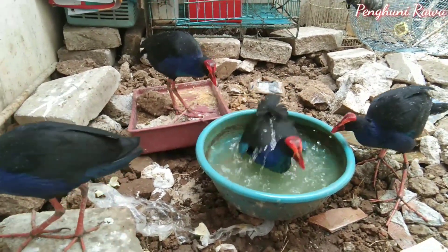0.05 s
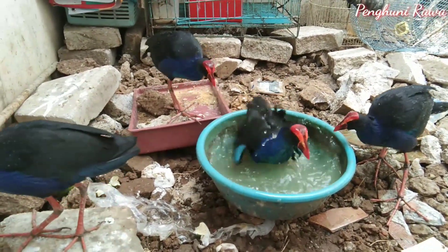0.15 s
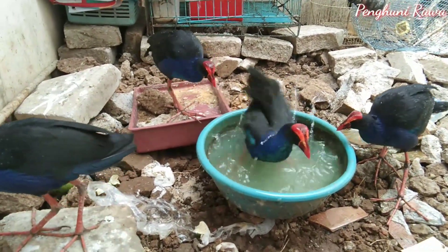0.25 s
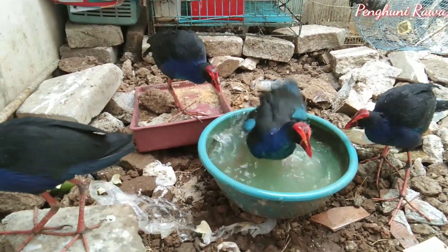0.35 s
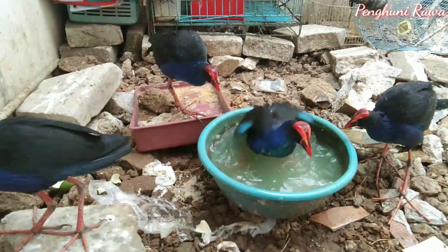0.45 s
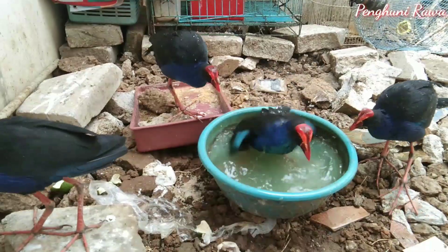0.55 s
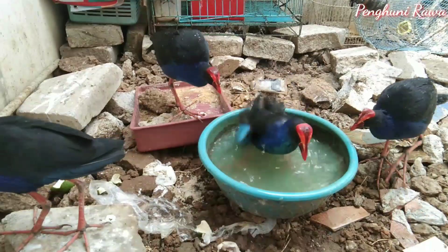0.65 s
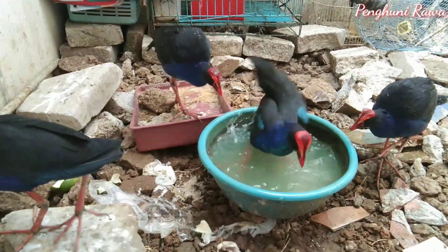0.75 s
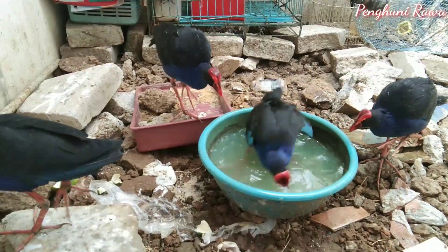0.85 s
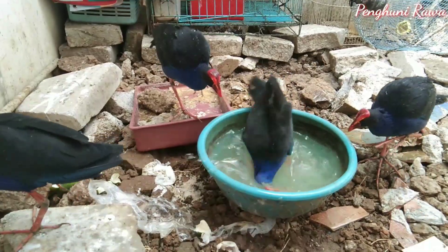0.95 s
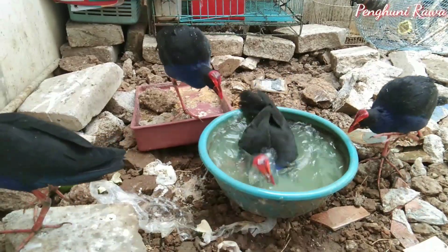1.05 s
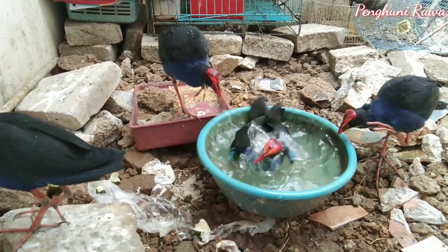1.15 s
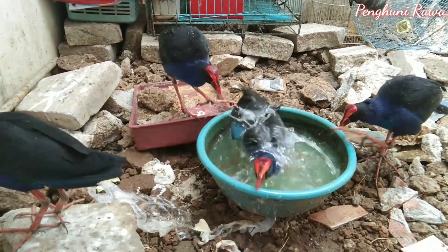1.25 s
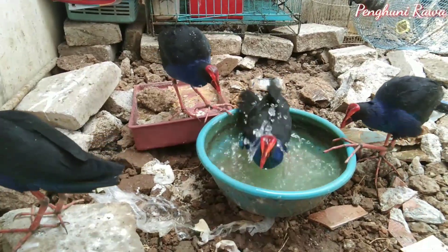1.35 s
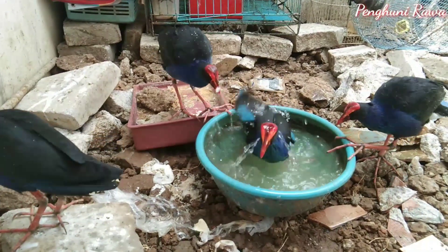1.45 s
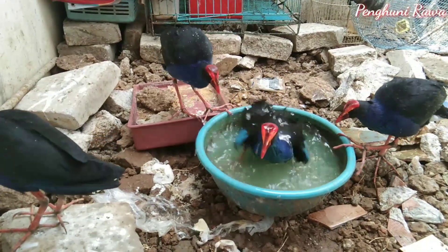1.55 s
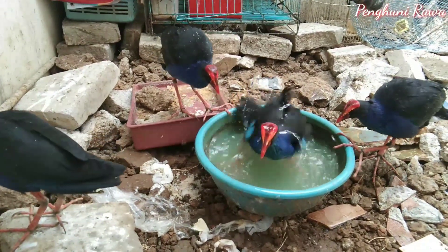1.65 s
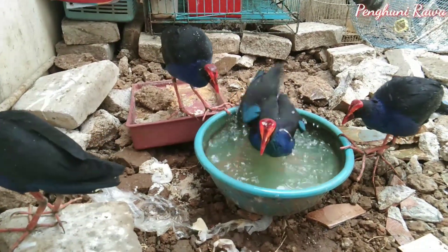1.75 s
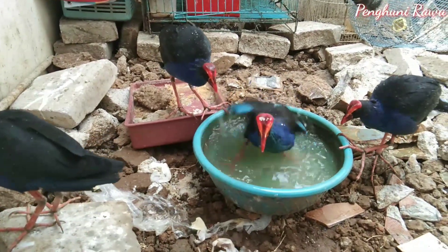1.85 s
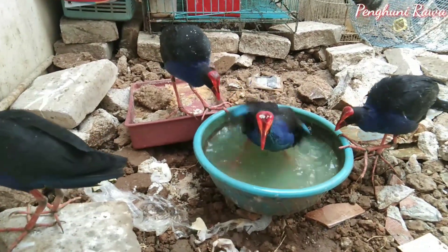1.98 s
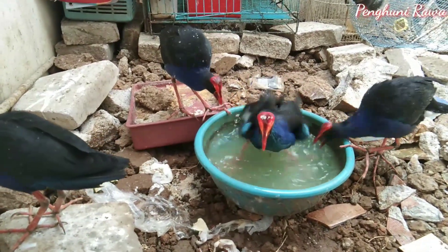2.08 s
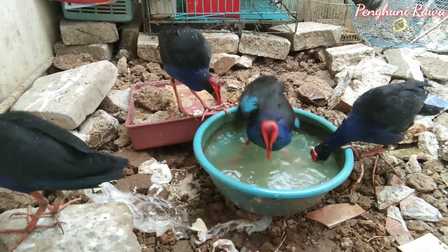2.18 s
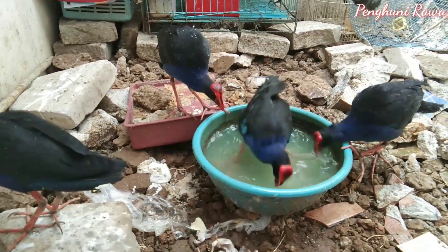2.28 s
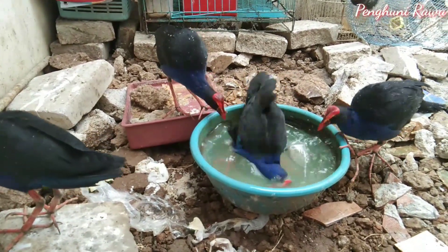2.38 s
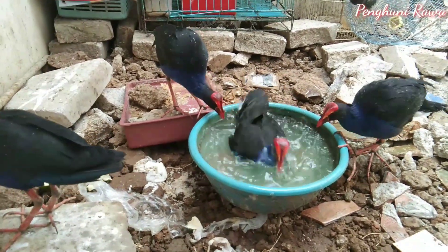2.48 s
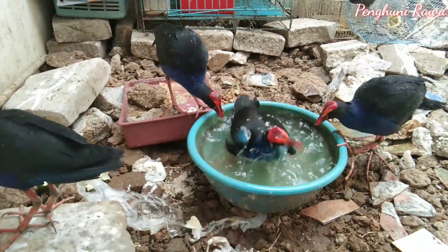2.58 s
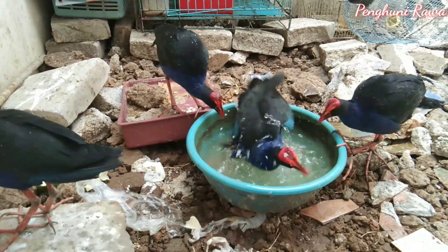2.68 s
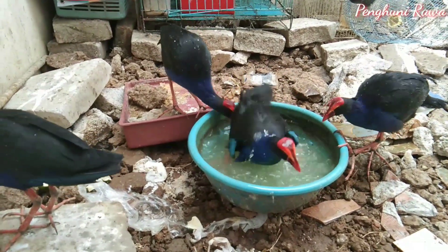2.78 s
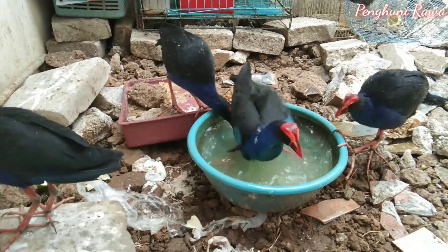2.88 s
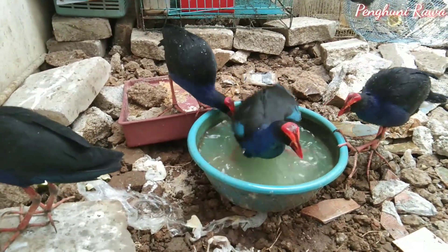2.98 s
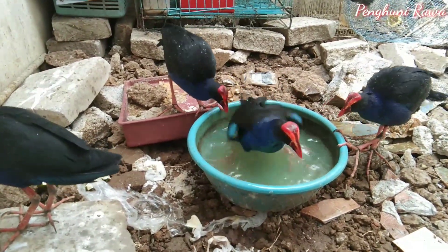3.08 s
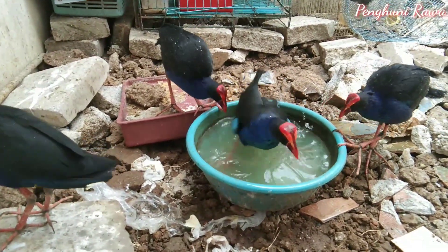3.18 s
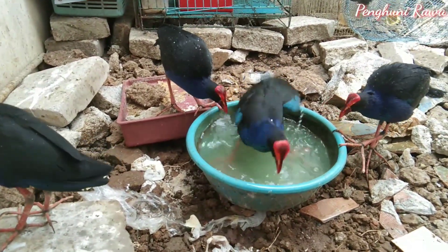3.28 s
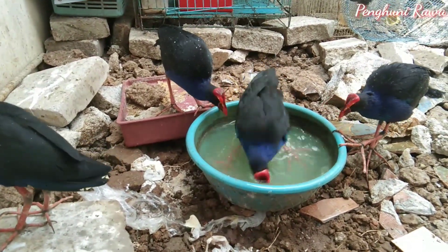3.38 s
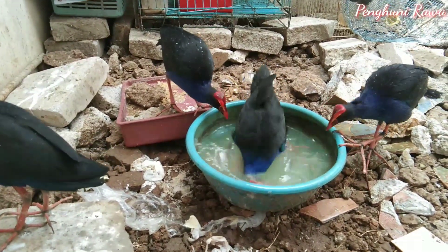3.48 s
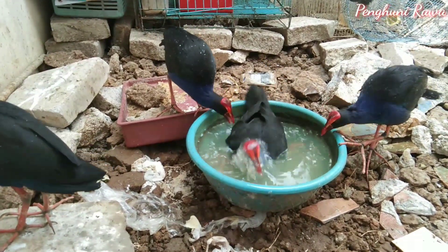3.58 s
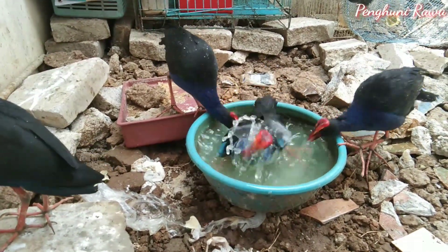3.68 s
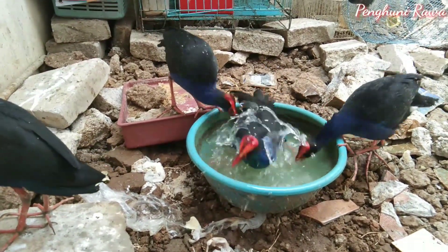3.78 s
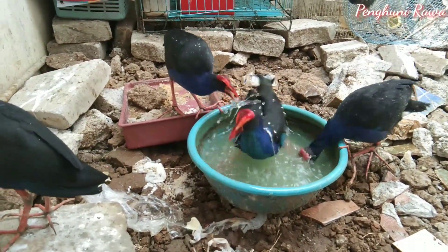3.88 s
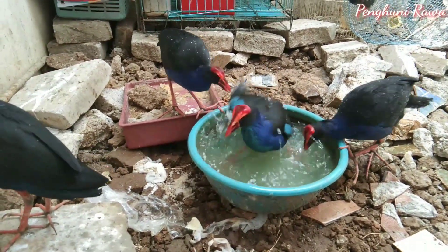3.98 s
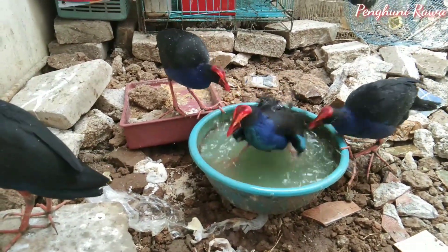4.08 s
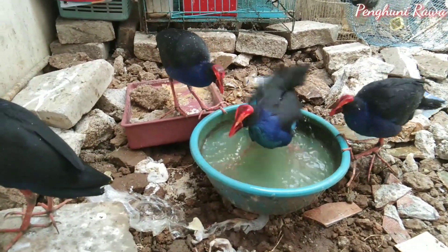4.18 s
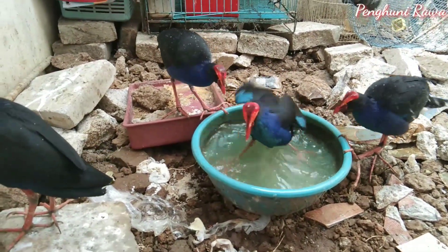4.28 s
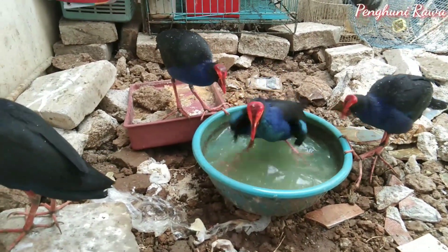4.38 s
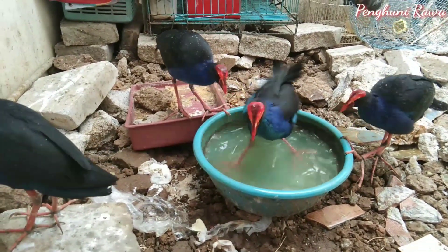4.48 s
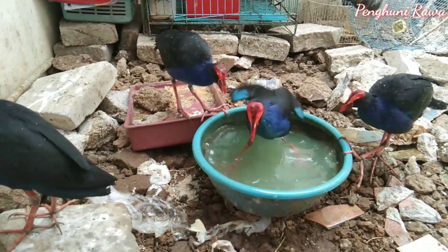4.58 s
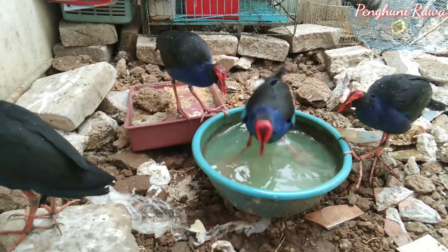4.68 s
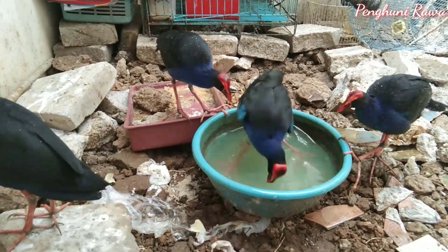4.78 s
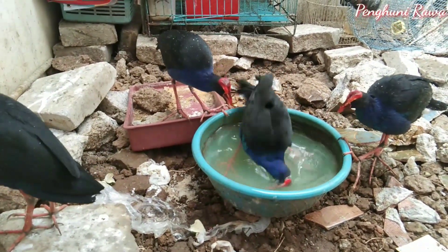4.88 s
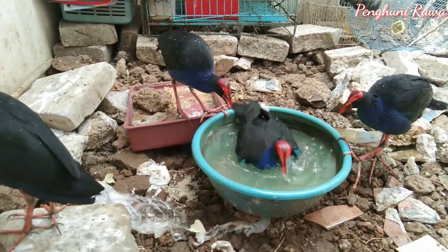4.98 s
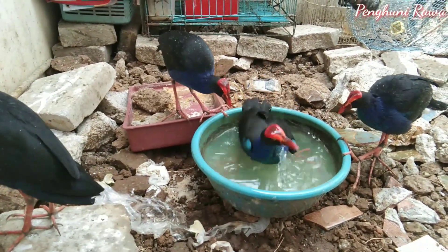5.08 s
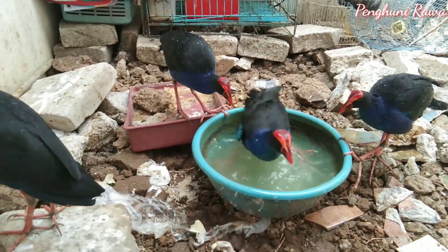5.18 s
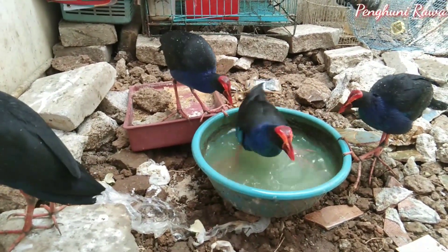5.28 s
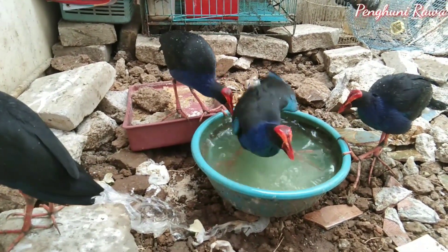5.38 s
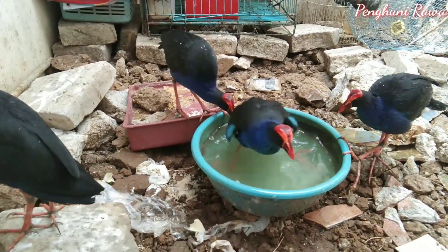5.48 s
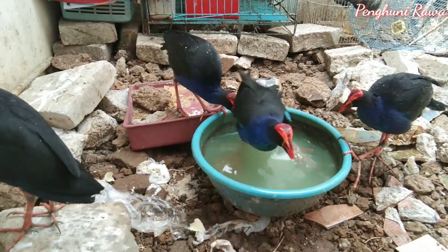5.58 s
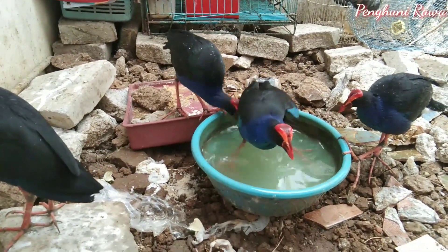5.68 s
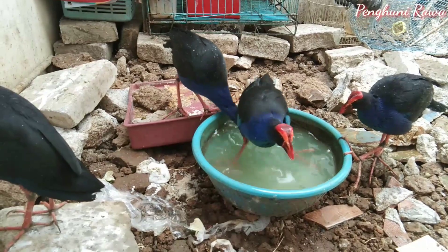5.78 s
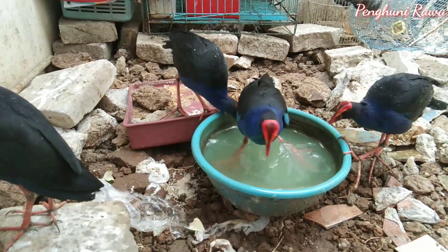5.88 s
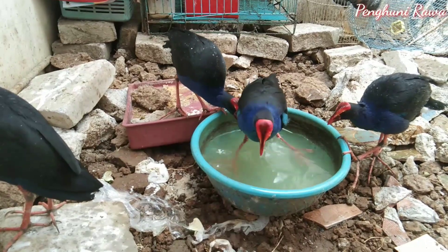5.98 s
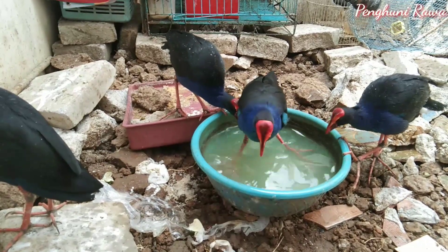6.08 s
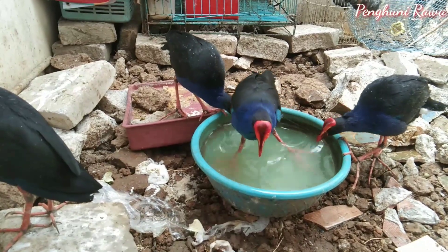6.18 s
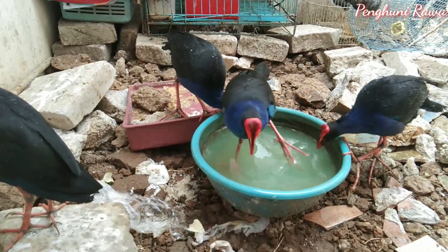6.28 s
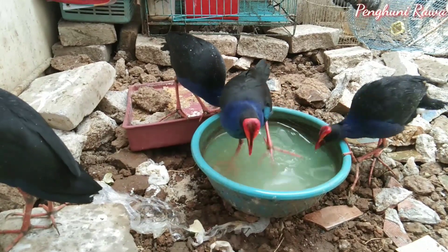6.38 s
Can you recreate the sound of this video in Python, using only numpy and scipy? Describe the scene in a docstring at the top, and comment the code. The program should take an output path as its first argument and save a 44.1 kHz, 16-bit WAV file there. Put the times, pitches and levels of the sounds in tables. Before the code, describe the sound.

A large wading bird bathes in a plastic basin in a walled yard, heard close up. Uneven bursts of bright spray follow one another quickly, with wet slaps, high plinks and a thin trickle. The hardest splash comes early; another lively flurry of drips comes past the middle. Then the splashing thins to near quiet, with faint far-off bird twitter over low yard rumble.

```python
"""A wading bird bathes in a plastic basin in a walled yard, heard close up by one microphone.
Thrown water is coloured noise and tiny droplet sounds, fine and heavy, over a slow trickle.
Slaps are clicks with a short crackle; blips and plinks in the water are rising, dying sines.
Narrow breathy bands linger in the wash, and one hard drop ticks on the rim.
Small birds far off twitter in sliding sines over the hiss, rumble and hum of the yard."""
import sys
import numpy as np
from scipy import signal
from scipy.io import wavfile
from scipy.ndimage import uniform_filter1d

SR = 44100
rng = np.random.default_rng(int(sys.argv[2]) if len(sys.argv) > 2 else 0)


def wav_out(sig):
    """Save sig, one row per channel (or a flat mono array), as 16-bit PCM at SR to the path in sys.argv[1]."""
    wavfile.write(sys.argv[1], SR, np.round(np.clip(np.atleast_2d(sig).T, -1, 1) * 32767).astype(np.int16))


N = 284004  # length in samples

# The slow trickle under everything. Each row: time in seconds, level of its fine spray in dB.
TRICKLE = [(0, -49), (.9, -51.5), (1.2, -51.5), (2.1, -53), (2.3, -62), (3.55, -60.5), (3.8, -50),
           (4.25, -51.5), (4.6, -58), (5.2, -53.5), (5.9, -64), (6.15, -75.5), (6.44, -59.5)]
# Thrown water landing as a sudden, dying hiss. Each row: start in seconds, fine spray level in dB,
# heavier drops in dB relative to the spray, time to die by 60 dB in seconds.
GUSHES = [(0.025, -41.5, -3.5, 0.38), (0.274, -39, -1.5, 0.14), (0.446, -40.5, -3, 0.44),
          (0.59, -43.5, -3, 1), (0.77, -36, -6.5, 0.42), (0.956, -36, -11, 0.99), (1.285, -40.5, -11, 0.46),
          (1.3232, -31, -1, 0.22), (1.3773, -43.5, -3, 1), (1.469, -41, -14, 0.48),
          (1.6094, -41, 0.5, 0.077), (1.672, -43.5, -2, 1), (1.837, -41, -2, 0.27), (2.011, -54, 12, 0.26),
          (2.121, -44.5, -3, 0.32), (2.192, -41.5, -11, 0.19), (2.332, -40, -10.5, 0.25),
          (2.5185, -44, -7, 0.38), (2.721, -36, -10.5, 0.14), (2.758, -38.5, -6.5, 0.27),
          (2.862, -39, -13.5, 0.11), (2.9935, -50.5, 6, 0.1), (3.02, -44.5, -1.5, 0.16),
          (3.127, -51.5, 5, 0.067), (3.261, -50, -3.5, 0.21), (3.481, -48.5, -27, 0.14),
          (3.62, -52.5, -2.5, 1), (3.666, -42.5, -9, 0.89), (3.909, -40.5, -4, 0.61),
          (4.068, -38.5, 2, 0.053), (4.3327, -37, -6, 0.54), (4.671, -51.5, -12, 0.97),
          (4.752, -39.5, -13, 0.36), (4.874, -43.5, -9, 0.45), (5.013, -52.5, -1, 0.88),
          (5.096, -47.5, 1.5, 0.37), (5.255, -43, -13, 0.74), (5.3118, -44.5, -4, 0.48),
          (5.589, -48, -23, 0.74), (5.763, -52.5, -4.5, 0.8), (5.947, -42.5, -2.5, 0.34),
          (6.359, -56, -22, 0.3)]
# Tone of the fine spray; only its shape counts. Each row: pitch in Hz, strength in dB per Hz.
FINE_SPECTRUM = [(2000, -52), (2900, -10), (3700, -5.5), (4700, -8.5), (6400, 0.5), (7500, -1.5),
                 (8300, -15.5), (9600, -16.5), (12300, -37.5), (15000, -29)]
# Tone of the heavier drops; only its shape counts. Each row: pitch in Hz, strength in dB per Hz.
HEAVY_SPECTRUM = [(50, -54.5), (150, -18.5), (350, -27), (540, -16.5), (1050, -8), (1450, -9), (1900, -5),
                  (2200, 0.5), (2550, -2.5), (2800, -8), (4200, -16), (6000, -38)]
# Change in the top end of the fine spray. Each row: time in seconds, change in dB.
TREBLE_CHANGE = [(0, -4.5), (1, -1.5), (2, -1.5), (4.3, -3.5), (4.7, -37), (5.3, -18), (5.62, 6),
                 (5.95, -32)]
# Tone of the distant hiss; only its shape counts. Each row: pitch in Hz, strength in dB per Hz.
YARD_SPECTRUM = [(30, -42), (48, 4), (100, 12.5), (170, 6), (500, 2.5), (1190, -2), (1550, 4.5),
                 (2290, -15), (4430, -10), (6700, -3), (8500, -10), (12100, -32), (15400, -24)]
# Swell of the far rumble. Each row: time in seconds, change in dB.
RUMBLE_SWELL = [(0, 4.5), (2.1, 4), (2.6, -1.5), (3.3, 3.5), (4.4, 1.5)]
# Short pitched blips and plinks in the water, from low bloops to high ticks.
# Each row: start in seconds, peak level in dB, starting pitch in Hz.
BLIPS = [(.066, -34, 2130), (.172, -36, 7200), (.189, -39, 7000), (0.4013, -31.5, 7000),
         (.435, -26.5, 6330), (.621, -31, 6970), (0.953, -30, 6600), (1.022, -41.5, 1015),
         (1.109, -30.5, 2490), (1.734, -36, 2120), (1.82, -32, 4630), (1.839, -31, 1635),
         (1.953, -33.5, 1993), (2.342, -39, 1710), (2.435, -37.5, 2310), (2.539, -37, 1530),
         (2.719, -37, 2460), (2.728, -37, 3660), (2.752, -35, 3600), (2.864, -41.5, 2146),
         (3.023, -35.5, 1305), (3.053, -43, 2150), (3.636, -32.5, 2400), (3.828, -34.5, 2180),
         (3.918, -32, 7200), (3.9396, -29.5, 7000), (3.989, -36, 7160), (4.030, -34, 5940),
         (4.073, -29, 2240), (4.087, -41, 2160), (4.1, -34, 2280), (4.115, -37, 4600), (4.122, -37.5, 946),
         (4.143, -40.5, 1310), (4.154, -33, 2070), (4.176, -28.5, 2377), (4.199, -41, 2350),
         (4.212, -38.5, 1820), (4.581, -42.5, 2290), (4.632, -40, 2200), (4.631, -51.5, 660),
         (4.924, -48, 618), (4.926, -33, 2270), (4.947, -48.5, 578), (4.951, -34.5, 2370),
         (5.387, -41.5, 2320), (5.547, -45, 2380), (5.575, -50, 2430)]
# Echoes off the basin wall. Each row: delay in seconds, level in dB relative to the direct sound.
WALL_ECHOES = [(.0027, -15)]
# Single drops smacking the water or the plastic. Each row: start in seconds, click level in dB
# before colouring, heavy body in dB relative to the click.
SLAPS = [(0.222, -32.5, 11.5), (0.661, -16, -20), (0.935, -22, -44), (1.0907, -18.5, -4),
         (1.109, -17.5, -23), (1.121, -19.5, -14), (1.3134, -1.5, -4.5), (1.3155, -2.5, 3.5),
         (1.379, -12, -9), (1.84, -27, -10), (1.929, -21.5, -25), (2.539, -21.5, -27), (3.908, -24, -1.5),
         (5.311, -19, -12), (5.574, -32, 6.5)]
# One hard drop on the rim. Each row: pitch in Hz, peak level in dB.
RIM_TICK = [(3750, -18), (7050, -20), (9500, -30)]
# Narrow breathy bands in the wash. Each row: start in seconds, end in seconds, middle pitch in Hz,
# level in dB before the fade.
BANDS = [(0.961, 1, 6230, -34.5), (0.96, 1.07, 8100, -48), (0.958, 1.06, 11400, -58),
         (.958, 1.04, 14500, -70), (1.024, 1.151, 3300, -45.5), (3.669, 4.093, 1400, -54),
         (5.007, 5.363, 1400, -58), (5.5, 5.93, 1610, -58)]
# Far birds, one note a row. Each row: start in seconds, length in seconds, level in dB,
# first pitch in Hz, last pitch in Hz, bow of the pitch in the middle in Hz.
TWITTER = [(2.585, .14, -75, 9000, 9200, -150), (6.086, .022, -76, 8100, 8500, 200),
           (6.132, .048, -73, 8650, 9150, 200), (6.168, .06, -70, 8100, 7450, 250),
           (6.215, .05, -74, 8350, 9050, 350), (6.238, .047, -69, 7600, 7200, 600),
           (6.27, .075, -74, 9050, 9050, -350), (6.294, .026, -73, 8200, 7400, 0),
           (6.388, .032, -73, 9200, 8700, 950), (6.426, .016, -72, 9300, 10100, 100)]

GUSH_RISE_S = 0.0014
TRICKLE_HEAVY_DB = -2.5  # heavier drops in the trickle, relative to its spray
TREBLE_HZ = 8160  # the top end of the spray starts here
BASIN_HZ, BASIN_T60_S, BASIN_DB = 365, 0.078, -19.5  # boom of the plastic; T60 = time to die by 60 dB
YARD_DB = -61.5
HUM_HZ, HUM_DB = 58.7, -74  # middle of the wavering pitch and level
# Ring time of a blip at 2 kHz, power by which low blips ring longer, and the longest ring allowed.
RING_T60_S, RING_SLOPE, LONGEST_RING_S = 0.032, 0.85, 0.065
RING_RISE = 0.32  # climb by the end of the ring, as a share of the starting pitch
SWELL_CYCLES = 1.5  # a blip swells in over a cycle or two
CRACKLE, CRACKLE_T60_S = 0.17, 0.017  # strength relative to the click, time to die by 60 dB
TICK_S, TICK_T60_S = 0.7265, 0.005  # start, time to die by 60 dB
BAND_WIDTH_HZ = 180  # half width at 6 kHz, narrower for low bands
QUAVER_HZ, QUAVER_PER_S = 70, 46  # the whistles tremble in pitch
EDGE_HZ = 15750  # upper limit of the whole sound


def gain_of(db):
    """Turns decibels into a plain multiplier."""
    return 10 ** (np.asarray(db) / 20)


def evened(x):
    """Scales a sound to an rms (average strength) of 1."""
    return x / np.sqrt(np.mean(x ** 2) + 1e-20)


def add(mix, s, sound):
    """Mixes a sound in at s seconds, cutting off what runs past the end."""
    part = mix[round(s * SR):][:len(sound)]
    part += sound[:len(part)]


def follow(points):
    """Draws straight lines through rows of time and level, one value per sample."""
    return np.interp(np.arange(N) / SR, *np.transpose(points))


def colour(points, size=4096):
    """Builds a filter of energy 1 with the given spectrum that never sounds ahead of its input."""
    hz, db = np.transpose(points)
    bins_hz = abs(np.fft.fftfreq(size, 1 / SR))
    bins_db = np.interp(np.log(bins_hz + 1), np.log(hz + 1), db)
    log_gain = np.log(gain_of(np.maximum(bins_db, -100)))
    # The Hilbert transform gives the phase that packs the energy at the front.
    taps = np.fft.ifft(np.exp(np.conj(signal.hilbert(log_gain)))).real[:size // 2]
    return taps / np.linalg.norm(taps)


def patchy(patchy_db, streaky_db, flicker_db):
    """White noise whose level drifts in patches and thin streaks and flickers across all pitches at once."""
    frames = N // 128 + 5
    a, b, patches, streaks = rng.standard_normal((frames, 257, 4)).T
    # Axis 0 is pitch and axis 1 is time; streaks are thin in pitch and long in time.
    patches = uniform_filter1d(uniform_filter1d(patches, size=14, axis=0), size=14, axis=1)
    streaks = uniform_filter1d(uniform_filter1d(streaks, size=2, axis=0), size=65, axis=1)
    flicker = evened(uniform_filter1d(rng.standard_normal(frames), size=3))
    level_db = patchy_db * evened(patches) + streaky_db * evened(streaks) + flicker_db * flicker
    z = (a + 1j * b) * gain_of(level_db)
    return evened(signal.istft(z, nperseg=512, noverlap=384)[1][:N])


def dying_sine(hz, t60, rise, swell_s):
    """A sine of envelope peak 1 that swells in and dies away; a rise above 0 makes its pitch climb."""
    t = np.arange(int(t60 * SR) + 2) / SR
    shape = gain_of(-60 * t / t60) * (1 - np.exp(-t / swell_s))
    wave = np.sin(2 * np.pi * hz * (t + rise * t ** 2 / (2 * t60)))
    return shape / shape.max() * wave


def droplets(low_hz, high_hz, cycles, per_s, spread_db):
    """Many tiny rising, dying sines at random moments, a few of them loud, in 24 pitches."""
    hits = rng.random(N) < per_s / SR
    size = gain_of(spread_db * np.minimum(rng.exponential(1, N), 4)) * hits
    kind, out = rng.integers(0, 24, N), np.zeros(N)
    for k, hz in enumerate(np.geomspace(low_hz, high_hz, 24)):
        grain = dying_sine(hz, cycles / hz, 0.37, 0.000074)
        grain = grain / np.linalg.norm(grain) * np.sqrt(hz)  # higher pitches get more energy
        out += signal.oaconvolve(size * (kind == k), grain)[:N]
    return evened(out)


def coloured(fine, heavy):
    """Gives the two sizes of drop their spectra; the heavy ones also ring the basin."""
    fine = signal.oaconvolve(fine, colour(FINE_SPECTRUM))[:N]
    top = signal.sosfiltfilt(signal.butter(3, TREBLE_HZ, "high", fs=SR, output="sos"), fine)
    fine = fine + (gain_of(follow(TREBLE_CHANGE)) - 1) * top
    t = np.arange(SR // 4) / SR
    boom = gain_of(-60 * t / BASIN_T60_S) * np.sin(2 * np.pi * BASIN_HZ * t)
    ring = signal.oaconvolve(heavy, gain_of(BASIN_DB) * boom / np.linalg.norm(boom))[:N]
    return fine + signal.oaconvolve(heavy, colour(HEAVY_SPECTRUM))[:N] + ring


def spray():
    """Hiss, droplets and tiny ticks in two sizes: a slow trickle plus every gush, powers adding."""
    power = gain_of(follow(TRICKLE) + [[0], [TRICKLE_HEAVY_DB]]) ** 2  # fine, then heavy
    t = np.arange(SR) / SR
    for s, db, heavy_db, t60 in GUSHES:
        shape = gain_of(db - 60 * t / max(t60, .02)) * (1 - np.exp(-t / GUSH_RISE_S))
        add(power[0], s, shape ** 2)
        add(power[1], s, (gain_of(heavy_db) * shape) ** 2)
    # Single drops sound in both sizes at once.
    hits = rng.random(N) < 240 / SR
    ticks = evened(rng.standard_normal(N) * rng.exponential(1, N) * hits)
    fine = patchy(3.27, 3.9, 1.3) + .58 * droplets(3360, 14300, 22, 1400, 3.3) + 0.24 * ticks
    heavy = patchy(2.5, 3.6, 1.6) + .36 * droplets(1100, 4000, 45, 600, 2.9) + .17 * ticks
    return coloured(np.sqrt(power[0]) * evened(fine), np.sqrt(power[1]) * evened(heavy))


def yard():
    """Distant hiss over a rumble that swells, with a low hum that wavers in pitch and level."""
    wash = patchy(0.35, 0.97, 0.08)
    wash = evened(signal.oaconvolve(wash, colour(YARD_SPECTRUM, size=16384))[:N])
    rumble = signal.sosfilt(signal.butter(2, 300, fs=SR, output="sos"), wash)
    wash = wash + (gain_of(follow(RUMBLE_SWELL)) - 1) * rumble
    waver = evened(uniform_filter1d(rng.standard_normal(N), size=6000))
    turns = np.cumsum(HUM_HZ + 1.1 * waver) / SR
    hum = np.sqrt(2) * gain_of(HUM_DB + 1.2 * waver) * np.sin(2 * np.pi * turns)
    return gain_of(YARD_DB) * wash + hum


def blips():
    """Short blips and plinks in the water, low bloops to high ticks: each a rising, dying sine."""
    out = np.zeros(N)
    for s, db, hz in BLIPS:
        t60 = min(RING_T60_S * (hz / 2000) ** -RING_SLOPE, LONGEST_RING_S)
        add(out, s, gain_of(db) * dying_sine(hz, t60, RING_RISE, SWELL_CYCLES / hz))
    return out


def walls(x):
    """Adds the close echoes, then a short scattered tail of random reflections."""
    t = np.arange(SR // 4) / SR
    hits = (rng.random(len(t)) < 2000 / SR) * (t > .004)
    tail = rng.choice([-1., 1.], len(t)) * hits * gain_of(-60 * t / 0.27)
    taps = gain_of(-10) * tail / np.linalg.norm(tail)
    taps[0] = 1  # the direct sound
    for s, db in WALL_ECHOES:
        taps[round(s * SR)] += gain_of(db)
    return signal.oaconvolve(x, taps)[:N]


def slaps():
    """Each slap is a click with a crackle of a few milliseconds, coloured like the drops."""
    fine, heavy, t = np.zeros(N), np.zeros(N), np.arange(SR // 50) / SR
    noise = rng.standard_normal((len(SLAPS), len(t)))
    for k, (s, db, body_db) in enumerate(SLAPS):
        push = (-1) ** k  # every other slap pushes the opposite way
        crackle = CRACKLE * noise[k] * gain_of(-60 * t / CRACKLE_T60_S)
        click = push * gain_of(db) * ((t == 0) + crackle)
        add(fine, s, click)
        add(heavy, s, gain_of(body_db) * click)
    return coloured(fine, heavy)


def tick():
    """The rim rings for a millisecond or two: a few dying sines of steady pitch."""
    out = np.zeros(N)
    for hz, db in RIM_TICK:
        add(out, TICK_S, gain_of(db) * dying_sine(hz, TICK_T60_S, 0, 2 / hz))
    return out


def bands():
    """Slow noise carried on a sine gives a narrow hiss; it starts fast and fades."""
    out = np.zeros(N)
    for start, end, hz, db in BANDS:
        t = np.arange(0, end - start, 1 / SR)
        half_width_hz = BAND_WIDTH_HZ * np.sqrt(hz / 6000)
        lowpass = signal.butter(2, half_width_hz, fs=SR, output="sos")
        a, b = signal.sosfilt(lowpass, rng.standard_normal((2, len(t))))
        hiss = evened(a * np.cos(2 * np.pi * hz * t) + b * np.sin(2 * np.pi * hz * t))
        fade = gain_of(db - 5 * t / t[-1])
        add(out, start, fade * hiss * signal.windows.tukey(len(t), .2))
    return out


def twitter():
    """Thin whistles that slide from one pitch to another over an arch, trembling on the way."""
    out = np.zeros(N)
    for s, length, db, first_hz, last_hz, bow_hz in TWITTER:
        u = np.arange(0, 1, 1 / (length * SR))  # 0 to 1 through the note
        quaver = QUAVER_HZ * np.sin(2 * np.pi * QUAVER_PER_S * (s + length * u))
        hz = first_hz + (last_hz - first_hz) * u + bow_hz * np.sin(np.pi * u) + quaver
        whistle = np.sin(2 * np.pi * np.cumsum(hz) / SR)
        add(out, s, np.sqrt(2) * gain_of(db) * whistle * signal.windows.tukey(len(u), .3))
    return out


def scene():
    """Adds all the sounds; one microphone feeds both channels."""
    mono = walls(slaps() + blips() + tick()) + spray() + bands() + twitter() + yard()
    return np.array([mono, mono])


def record(dry):
    """Cuts off everything above the upper limit with a steep filter."""
    lowpass = signal.firwin(511, EDGE_HZ, window=("kaiser", 9), fs=SR)
    return signal.oaconvolve(dry, lowpass[None], "same")


dry = scene()
out = record(dry)
wav_out(out)
```